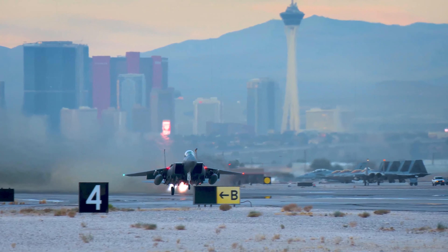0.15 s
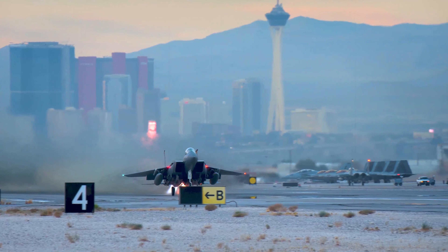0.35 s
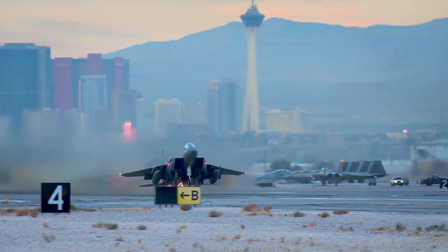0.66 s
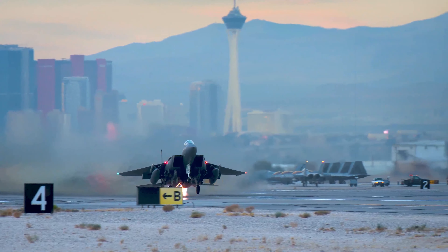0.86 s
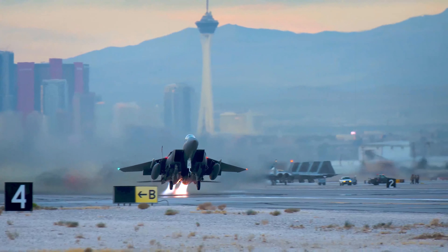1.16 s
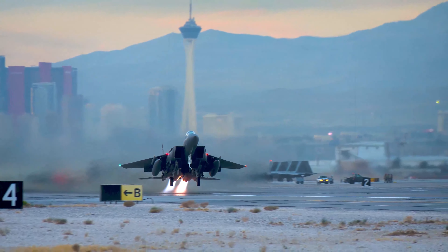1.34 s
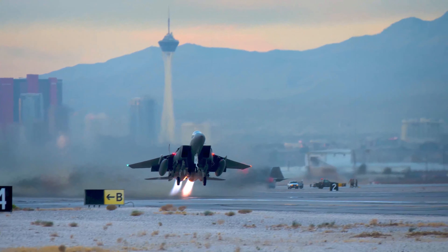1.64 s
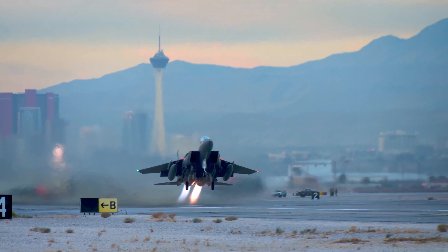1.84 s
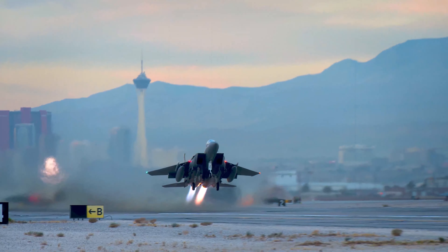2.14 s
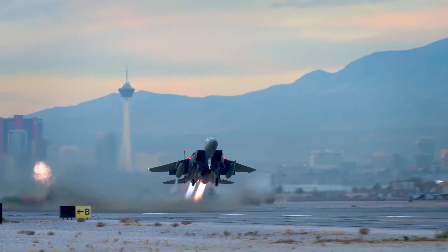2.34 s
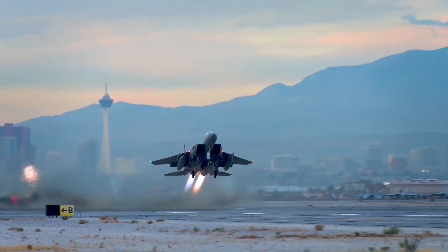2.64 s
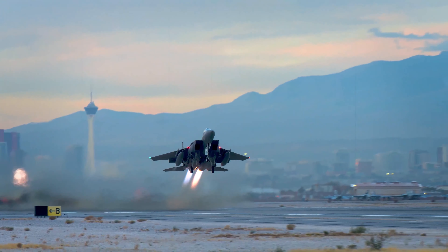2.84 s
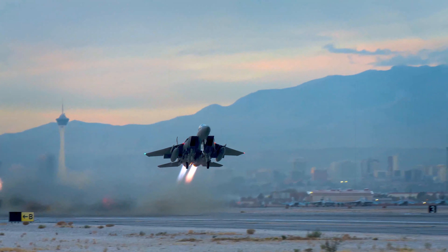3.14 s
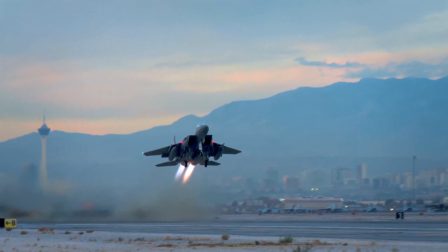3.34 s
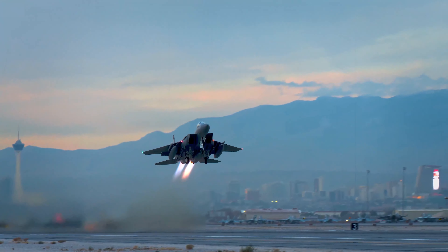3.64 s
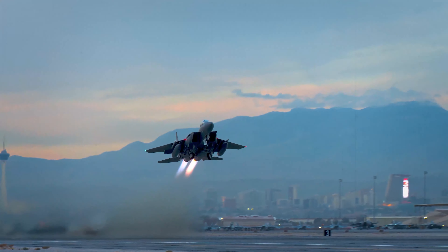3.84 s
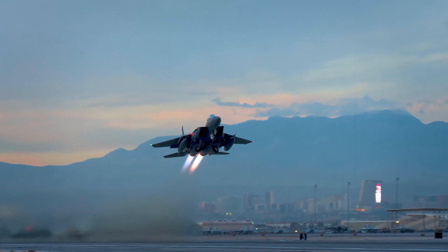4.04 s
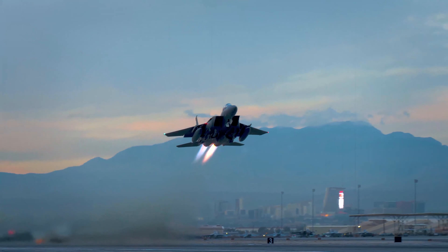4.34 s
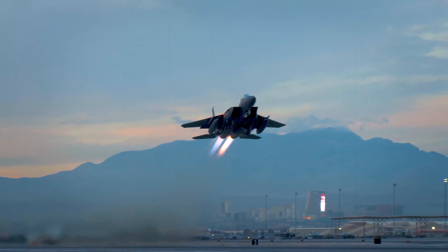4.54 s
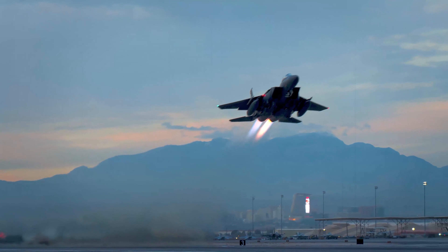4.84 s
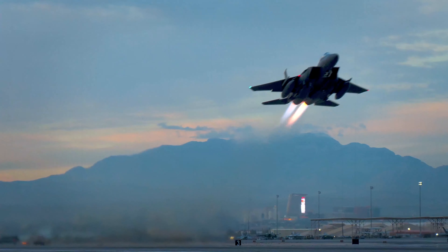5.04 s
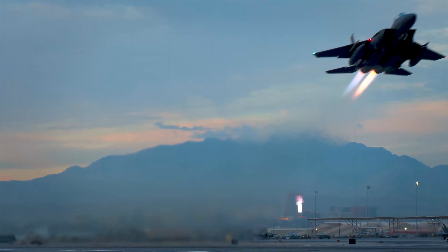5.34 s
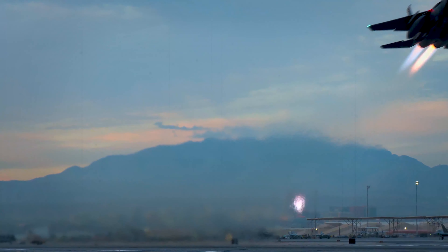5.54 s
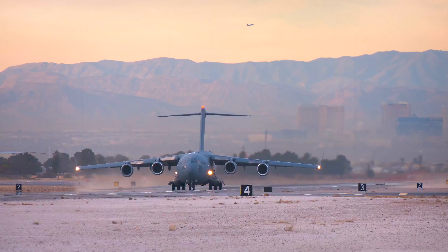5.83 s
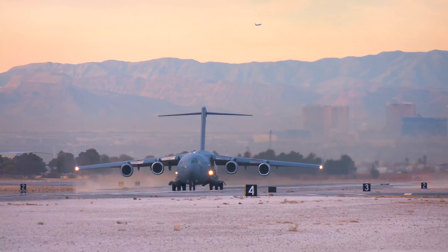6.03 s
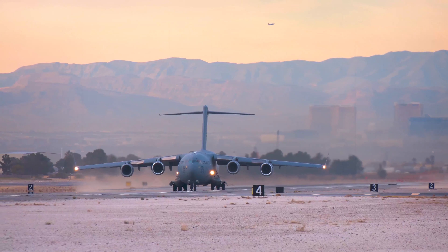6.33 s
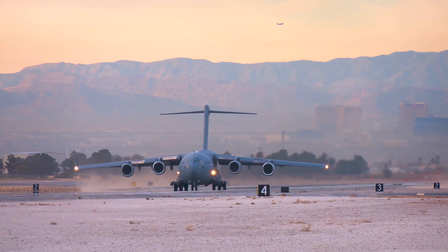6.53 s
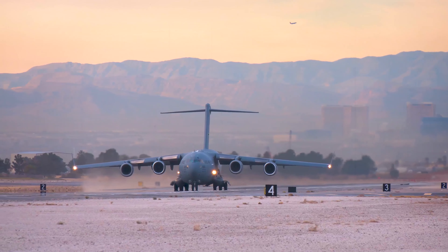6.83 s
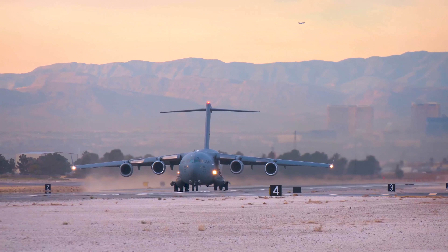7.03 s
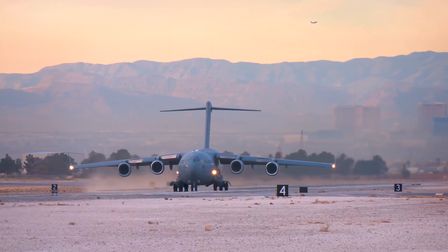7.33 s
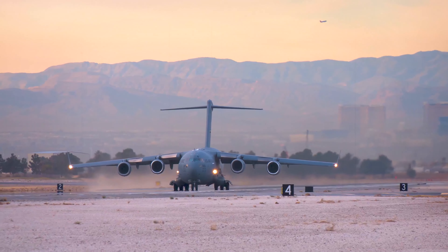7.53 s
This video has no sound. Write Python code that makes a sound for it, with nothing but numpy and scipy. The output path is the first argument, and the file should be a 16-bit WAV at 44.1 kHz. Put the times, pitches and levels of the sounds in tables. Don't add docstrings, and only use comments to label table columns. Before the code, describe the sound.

A distant fighter jet takes off on afterburner, its roar swelling into ragged crackle, then cuts abruptly to a transport plane's quieter, dull engine rumble.

```python
import sys
import numpy as np
from scipy import signal
from scipy.fft import rfft, irfft, next_fast_len
from scipy.io import wavfile
from scipy.ndimage import uniform_filter1d

SR = 44100
rng = np.random.default_rng(int(sys.argv[2]) if len(sys.argv) > 2 else 0)


def transcribe(signal):
    frames = np.atleast_2d(signal).T
    limited = np.clip(frames, -1, 1)
    pcm = np.round(limited * 32767).astype(np.int16)
    wavfile.write(sys.argv[1], SR, pcm)


def invert_db(level):
    return 10 ** (np.asarray(level, dtype=float) / 20)


N = 338681
FFT_SIZE = next_fast_len(N)
HZ = np.maximum(np.arange(FFT_SIZE // 2 + 1) * SR / FFT_SIZE, 1)
TIME_S = np.arange(N) / SR
LIFTOFF_S = 2
CUT_S = 5.8585


def rms_one(x):
    return x / np.sqrt(np.mean(x ** 2) + 1e-20)


def noise():
    return rng.standard_normal(N)


def in_time(rows):
    s, *columns = np.transpose(rows)
    return [np.interp(TIME_S, s, column) for column in columns]


def bump(at_s, half_s):
    return np.exp(-.5 * ((TIME_S - at_s) / half_s) ** 2)


def shape(x, gain):
    return irfft(rfft(x, FFT_SIZE) * gain, FFT_SIZE)[..., :N]


def colour(points):
    hz, level_db = np.transpose(points)
    return invert_db(np.interp(np.log(HZ), np.log(hz), level_db))


def split(x, centres_hz):
    bands = []
    for only_one in np.eye(len(centres_hz)):
        gain = np.interp(np.log(HZ), np.log(centres_hz), only_one)
        bands.append(rms_one(shape(x, gain)))
    return bands


def drift(rate_hz):
    r = np.exp(-80 * np.pi * rate_hz / SR)
    slow = signal.lfilter([1], [1, -2 * r, r * r], rng.standard_normal(N // 40 + 2002))
    slow = rms_one(slow[2000:])
    return np.interp(np.arange(N) / 40, np.arange(len(slow)), slow)


def whines(table):
    gain = 0
    for hz, width_hz, level_db in table:
        resonance = 1 / (1 + ((HZ - hz) / (width_hz / 2)) ** 2)
        gain = gain + invert_db(level_db) * rms_one(resonance)
    return invert_db(.8 * drift(7)) * shape(noise(), gain)


def shock_pulses(per_s, spread_db, clump_db, steepening):
    born = rng.random(N) < per_s / SR
    size_db = spread_db * np.minimum(rng.exponential(1, N), 3.6) + clump_db * drift(34.0)
    sizes = born * invert_db(size_db)
    fronts = sizes ** steepening
    front_level = np.sqrt(uniform_filter1d(fronts ** 2, size=SR // 4))
    return rms_one(sizes), fronts / front_level


# frequency in Hz, level in dB per Hz.
JET_COLOUR = [(18, -62), (30, -40.5), (130, 1.5), (260, -3.5), (495, -3), (806, -0.5), (1160, -2.5),
              (1530, -9.5), (1930, -7), (2630, -16.5), (3070, -14.5), (3490, -19), (4180, -21), (7200, -39),
              (9520, -55), (14000, -60)]
# centre in Hz, then the level of each in dB.
JET_BANDS_HZ = [110, 700, 2600, 6500]
BAND_TRIM_DB = [-0.03, -2.13, -1.07, -18.5]
# time in seconds, roar in dB, haze loss in dB per kHz, ground shadow on the bass in dB.
FLIGHT = [(0, -50.5, 4, 7), (.7, -48, 4, 6), (1.4, -45.5, 4, 7), (1.75, -43, 3, 6), (2.2, -33, 6.5, 40),
          (2.35, -28.5, 5.5, 37), (2.62, -30, 5, 17), (2.92, -36, 3, 9), (3.2, -36.5, 2, -1),
          (3.4, -34, 2, 5.5), (3.84, -29.5, -0.33, 9.5), (4.02, -29.5, 1.5, 10), (4.35, -27.5, 2.5, 8),
          (4.62, -30, 2, 7.5), (4.87, -33, 2.5, 7), (5.3, -34.5, 2, 8), (5.65, -36, 2.5, 8.5),
          (5.86, -30, 4, 18)]
# time in seconds, half length in seconds, treble change in dB.
POCKETS = [(2.61, 0.017, 15), (2.1, .15, -1), (2.45, .1, 4.5), (2.935, 0.14, -6.5), (3.227, 0.04, 2.5),
           (3.673, 0.15, 3.5), (3.964, 0.015, 8.5), (3.983, 0.01, -14), (4.12, 0.032, 5),
           (4.27, 0.048, 6.5), (4.426, 0.027, 1.5), (4.603, 0.031, 9), (4.92, .1, -2.5),
           (5.333, 0.16, -4.5), (5.79, 0.11, 7)]


def fighter():
    aloft_s = TIME_S - LIFTOFF_S
    aloft = 1 / (1 + np.exp(-aloft_s / 0.035))
    rolling_share, flying_share = 0.097, 0.37
    share = np.clip(rolling_share + (flying_share - rolling_share) * aloft, 0, 1)
    steepening = np.maximum(1 + aloft * (4.35 - 1 - aloft_s), .7)
    pulses, fronts = shock_pulses(per_s=1800.0, spread_db=1.5, clump_db=0.5, steepening=steepening)
    turbulence = np.sqrt(1 - share) * noise()

    low = 1 / (1 + (HZ / 2600) ** 4)
    body = shape(np.sqrt(share) * pulses + turbulence, low)
    edge = shape(np.sqrt(share) * fronts + 0.16 * turbulence, 1 - low)
    roar = ground_fringes(shape(body + edge, colour(JET_COLOUR)))

    roar_db, haze, shadow_db = in_time(FLIGHT)
    clear_db = sum(db * bump(at_s, half_s) for at_s, half_s, db in POCKETS)
    upper_loss_db = haze * JET_BANDS_HZ[2] / 1000 - .25 * clear_db
    top_loss_db = haze * JET_BANDS_HZ[3] / 1000 - clear_db
    losses_db = [shadow_db, 0, upper_loss_db, top_loss_db]
    sways_db = [.2, .4, .7, 1.6]
    gust = drift(25)
    heard = 0
    for band, trim, loss, sway in zip(split(roar, JET_BANDS_HZ), BAND_TRIM_DB, losses_db, sways_db):
        heard = heard + invert_db(roar_db + trim - loss + sway * gust) * band
    return heard


# start in seconds, end in seconds, first frequency in Hz, last frequency in Hz, peak or dip in dB.
FRINGES = [(-1, 2.24, 470, 700, -10.5), (1.93, 3.4, 800, 957, -17), (1, 2.7, 610, 610, 5.5),
           (2.5, 3.56, 740, 790, 6.5), (4, 5.16, 850, 780, 3.5), (0, 2.45, 990, 1410, 9),
           (1.5, 2.46, 975, 990, 5), (3, 4.1, 1160, 1460, 5.5), (3.5, 3.95, 1620, 1430, -7),
           (5, 5.45, 1580, 1720, -9), (1.5, 4.38, 2110, 1730, 6), (2.1, 3.66, 3030, 3070, 7),
           (3, 4.54, 520, 500, 8), (1.6, 2.8, 260, 290, -6), (3.5, 4.6, 390, 290, -7.5),
           (3, 3.5, 340, 390, -8), (5.15, 6.06, 370, 370, 9.5), (3, 4.57, 1550, 1380, 4.5),
           (3, 6, 2000, 2430, 3), (2, 10, 1980, 1840, -2), (1.9, 2.05, 290, 436, 9.5),
           (1.84, 2.3, 1210, 1380, 3.5), (2.6, 3.53, 220, 230, -5), (4.5, 5.45, 1020, 1210, 3)]


def ground_fringes(x):
    hz, s, frames = signal.stft(x, SR, nperseg=1024)
    width_hz = 55
    level_db = 0
    for start, end, first_hz, last_hz, depth_db in FRINGES:
        along = np.clip((s - start) / (end - start), 0, 1)
        centre_hz = first_hz + (last_hz - first_hz) * along
        bell = np.exp(-.5 * ((hz[:, None] - centre_hz) / width_hz) ** 2)
        swell = np.sqrt(np.abs(np.sin(np.pi * along)))
        level_db = level_db + depth_db * swell * bell
    return signal.istft(frames * invert_db(level_db), SR, nperseg=1024)[1][:N]


# time in seconds, peak in dB, treble in dB.
SWELL_CRACKS = [(2.2922, -37, -36), (2.2984, -40, -38), (2.3156, -42, -36), (2.3214, -32, -40),
                (2.3493, -30, -42), (2.3554, -40, -39), (2.3674, -52, -37), (2.3791, -27, -43),
                (2.4079, -29, -45), (2.4404, -36, -44), (2.4454, -33, -41), (2.4604, -34, -39),
                (2.478, -28, -48), (2.4974, -30, -44), (2.5094, -51, -36), (2.5526, -39, -35),
                (2.5614, -39, -34), (2.587, -31.5, -37), (2.6174, -32.5, -42), (2.6254, -33, -39),
                (2.6638, -47, -27), (2.7024, -44, -35), (2.7146, -42, -32), (3.013, -34, -44),
                (3.2011, -47, -36), (3.2163, -34, -39), (3.3732, -49, -37), (3.4366, -25.5, -43),
                (3.48, -26, -40), (3.5304, -53, -41)]
CLOSE_CRACKS = [(3.5874, -24, -37), (3.6034, -47, -28), (3.6282, -26, -27), (3.67, -35, -21),
                (3.703, -25, -22.5), (3.7222, -27, -28), (3.7638, -24, -30), (3.819, -23, -21.5),
                (3.8335, -24.5, -19), (3.862, -41, -23), (3.8834, -29, -17), (3.9385, -21, -27),
                (3.962, -32, -20), (3.976, -31, -24), (4.0108, -24, -28), (4.083, -28, -47),
                (4.1766, -34, -23), (4.2109, -24.5, -28), (4.257, -28, -25), (4.3054, -40, -33),
                (4.334, -26, -37), (4.4374, -25, -35), (4.4782, -32, -39), (4.5619, -25, -34),
                (4.5984, -32, -36), (4.6548, -27, -31), (4.741, -28, -43), (4.7651, -28, -33),
                (5.8192, -30, -35), (5.8565, -35, -23)]
# frequency in Hz, level in dB.
CRACK_BODY = [(300, 6), (1000, 21), (2500, 15), (5000, 2), (7000, -9), (8500, -22), (11000, -40)]


def cracks():
    roar_db, haze, _ = in_time(FLIGHT)
    aloft_s = TIME_S - LIFTOFF_S
    born = (rng.random(N) < 200 / SR) * (aloft_s > 0)
    small_db = roar_db + 3 - 2.8 * haze - 6 * aloft_s
    small_db = small_db + 2.5 * noise() + 3.5 * drift(30.0)
    dull = born * invert_db(small_db)
    bright = born * invert_db(small_db - 50)

    s, peak_db, treble_db = np.transpose(list(SWELL_CRACKS) + list(CLOSE_CRACKS))
    at = np.round((s + .001) * SR).astype(int)
    dull[at] = invert_db(peak_db + 6)
    bright[at] = invert_db(peak_db + treble_db + 15)

    decay = signal.lfilter([1], [1, -.98], np.array([dull, bright]) + 1e-18)
    dull_tail, bright_tail = decay * rng.standard_normal((2, N))
    treble = colour([(5000, -16), (8000, 6.5), (13000, -2.5), (15500, -12)])
    body = shape(dull + 0.16 * dull_tail, colour(CRACK_BODY))
    return body + shape(bright + 0.35 * bright_tail, treble)


# frequency in Hz, level in dB per Hz.
RUMBLE_COLOUR = [(15, -46), (25, -59), (61, -12.5), (81, -0.5), (106, -7), (141, -14.5), (192, -8),
                 (226, -10), (296, -21.5), (330, -20.5), (430, -50), (730, -120)]
ROAR_COLOUR = [(180, -20), (300, -7.5), (397, -9), (482, -3.5), (586, -6), (638, -7), (804, -5), (865, -4),
               (1410, -13), (2230, -21), (2520, -25), (3380, -43), (4160, -45), (5500, -81), (7150, -74),
               (12100, -120)]
# frequency in Hz, width in Hz, level in dB.
TRANSPORT_WHINES = [(80.6, 16, -64), (2670, 170, -73), (4190, 210, -83)]
# time in seconds, rise in dB.
THUMPS = [
    (6.142, 7),
    (6.36, 5),
    (6.61, 3),
]


def transport():
    rumble = rms_one(shape(noise(), colour(RUMBLE_COLOUR)))
    roar = rms_one(shape(noise(), colour(ROAR_COLOUR)))
    rumble_db = -45.5 + 1.5 * (TIME_S - CUT_S)
    rumble_db = rumble_db + sum(db * bump(at_s, 0.011) for at_s, db in THUMPS)
    wash = invert_db(rumble_db + .5 * drift(39.0)) * rumble + invert_db(-49 + 0.2 * drift(30.0)) * roar
    return wash + whines(TRANSPORT_WHINES)


# frequency in Hz, level in dB per Hz.
APRON_COLOUR = [(18, -72), (30, -26), (97, -3.5), (158, -2), (288, -9), (367, -2.5), (479, -16),
                (524, -9.5), (932, -6), (1520, -20.5), (1810, -18.5), (2700, -31.5), (6000, -59),
                (7800, -78), (13200, -120)]
# frequency in Hz, width in Hz, level in dB.
APRON_WHINES = [(361, 40, -57), (1800, 90, -68), (2710, 150, -62), (3530, 300, -82), (4250, 300, -88)]


def apron():
    wash = rms_one(shape(noise(), colour(APRON_COLOUR)))
    return invert_db(-44.5 + .5 * drift(5)) * wash + whines(APRON_WHINES)


# frequency in Hz, level in dB per Hz.
HISS_COLOUR = [(20, 11), (50, 9), (100, 6), (250, 3), (1000, 1.5), (3000, 1), (9000, -.5), (14000, 0)]


def preamp_hiss():
    hiss = shape(rng.standard_normal((2, N)), colour(HISS_COLOUR) * (HZ < 15000))
    return invert_db(-68.6) * rms_one(hiss)


def scene():
    jet = 2 * fighter()
    crests = shape(jet ** 2, colour([(100, -28), (400, -9), (3000, -34), (6000, -4)]))
    airfield = jet + .5 * crests + 2 * (cracks() + apron())
    heard = np.where(TIME_S < CUT_S, airfield, 2 * transport())
    return np.array([heard, np.zeros(N)])


def low_pass(x):
    return signal.sosfilt(signal.butter(12, 15710, fs=SR, output="sos"), x)


def record(dry):
    rounded = .5 * np.tanh(dry / .5)
    return low_pass(rounded + preamp_hiss())


dry = scene()
out = record(dry)
transcribe(out)
```